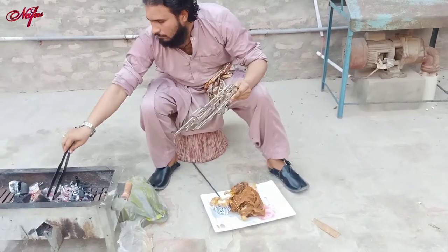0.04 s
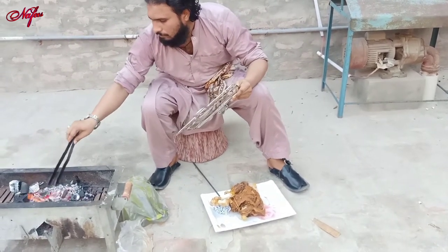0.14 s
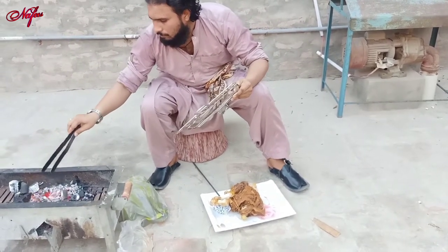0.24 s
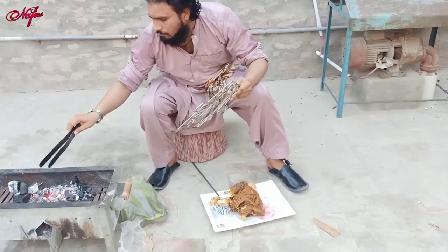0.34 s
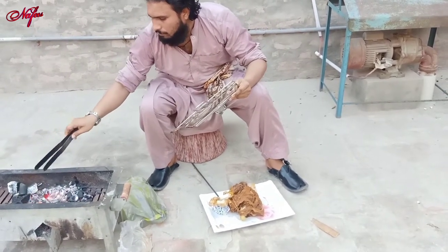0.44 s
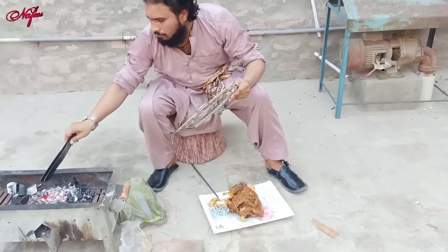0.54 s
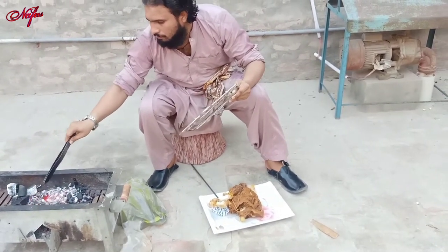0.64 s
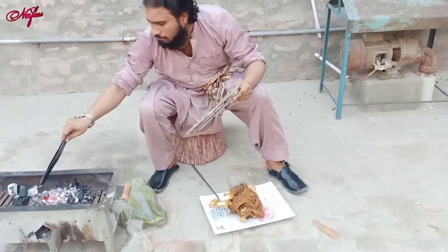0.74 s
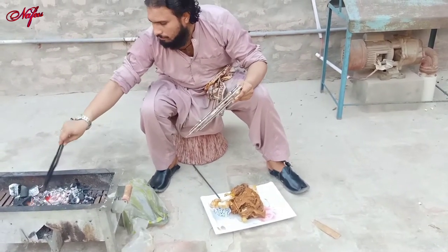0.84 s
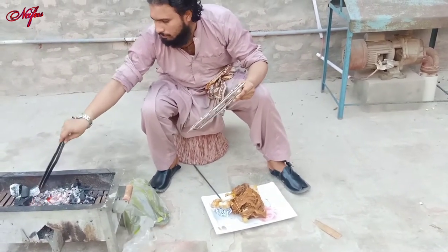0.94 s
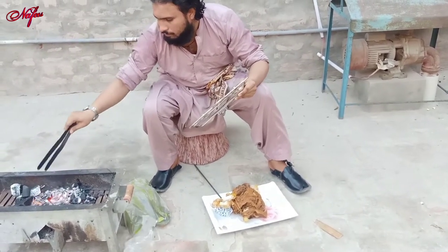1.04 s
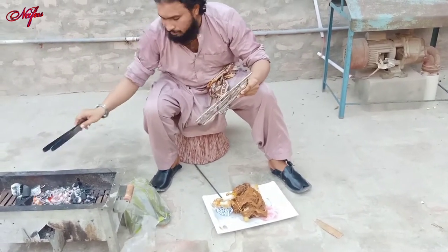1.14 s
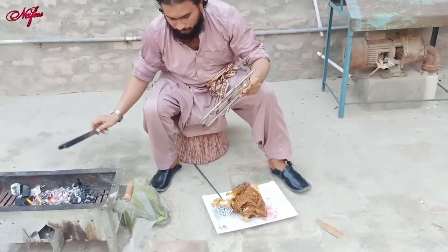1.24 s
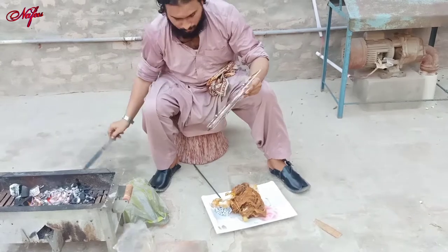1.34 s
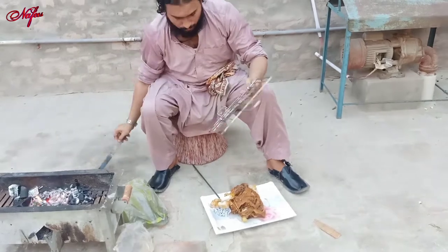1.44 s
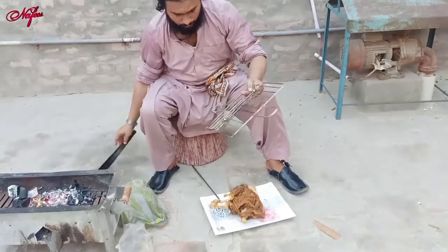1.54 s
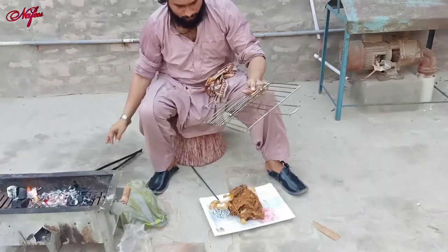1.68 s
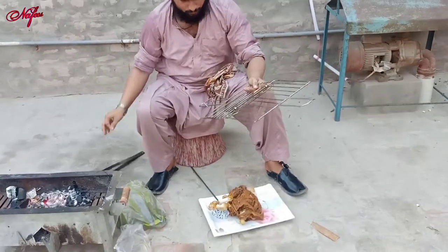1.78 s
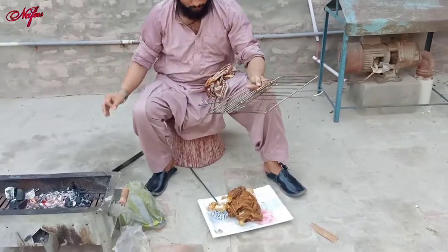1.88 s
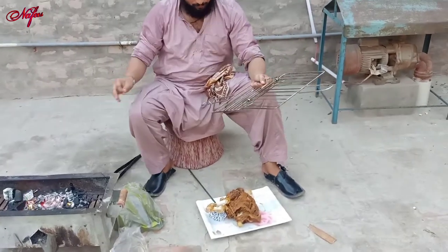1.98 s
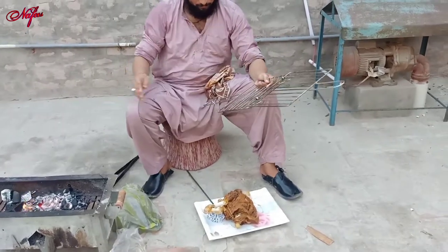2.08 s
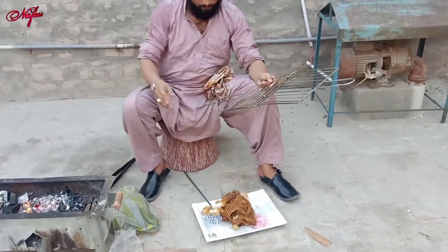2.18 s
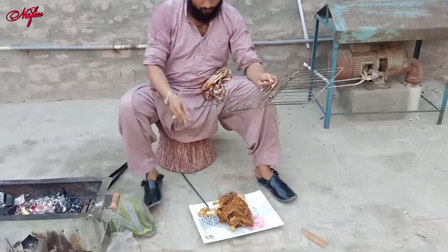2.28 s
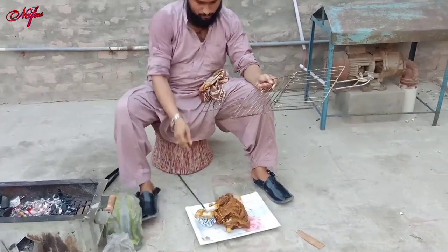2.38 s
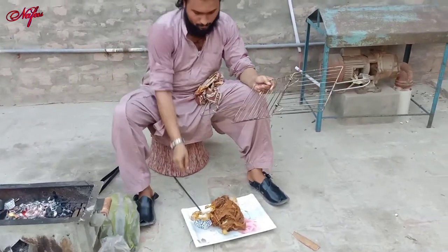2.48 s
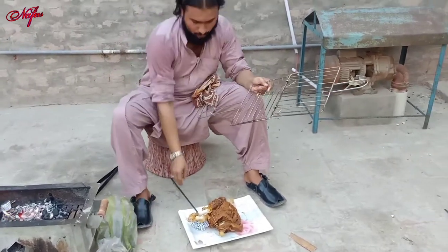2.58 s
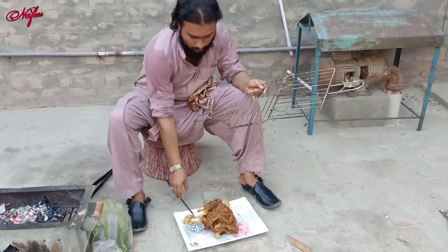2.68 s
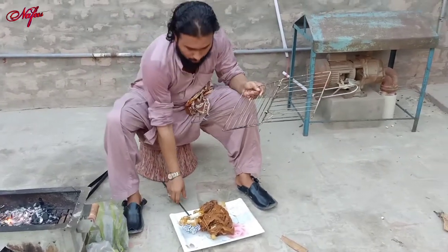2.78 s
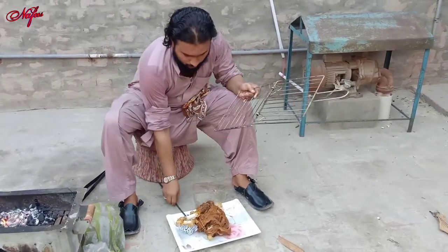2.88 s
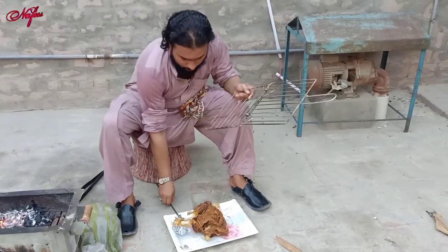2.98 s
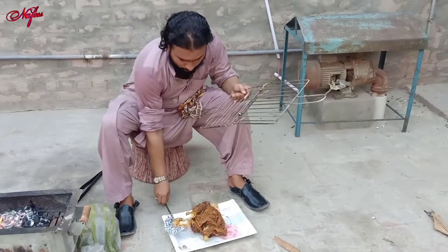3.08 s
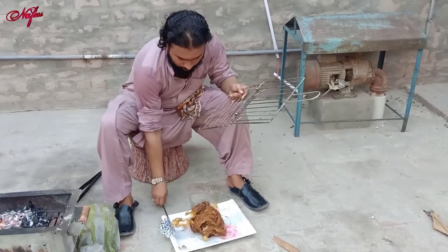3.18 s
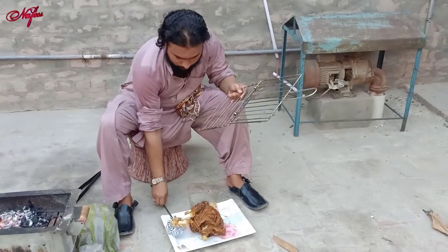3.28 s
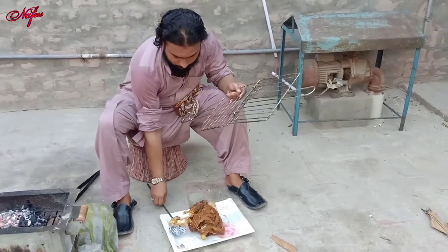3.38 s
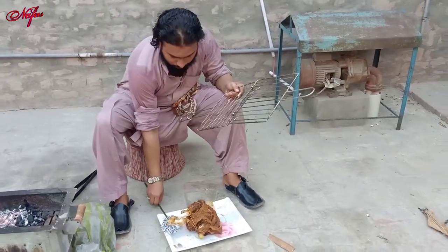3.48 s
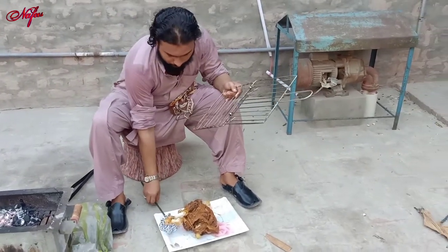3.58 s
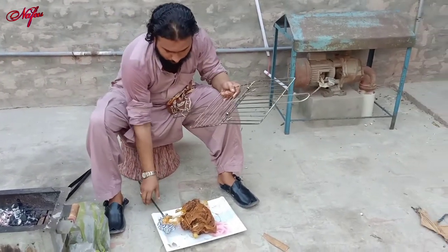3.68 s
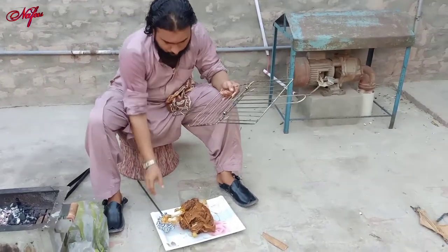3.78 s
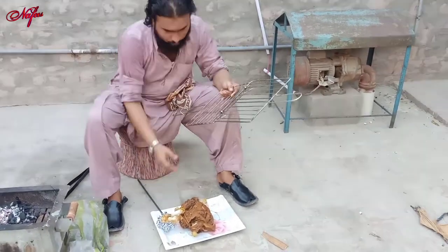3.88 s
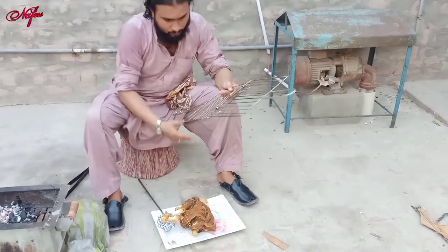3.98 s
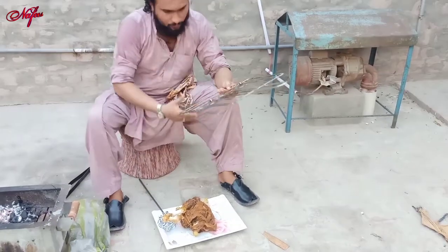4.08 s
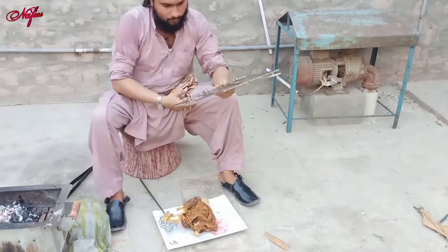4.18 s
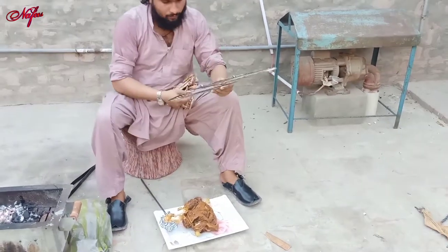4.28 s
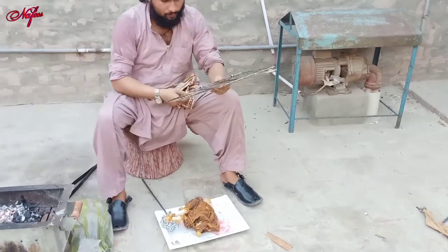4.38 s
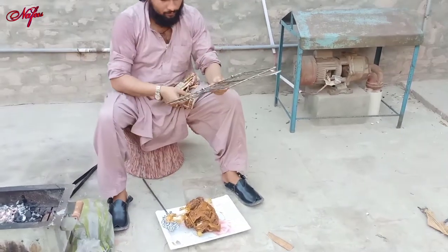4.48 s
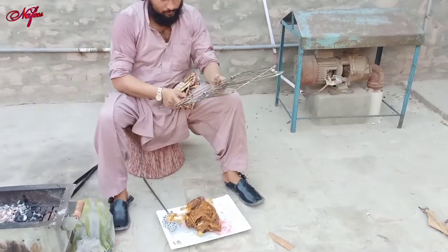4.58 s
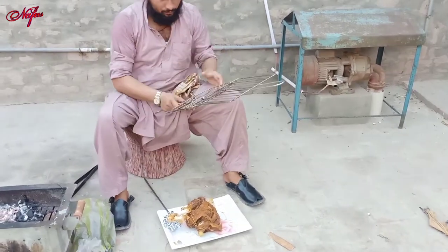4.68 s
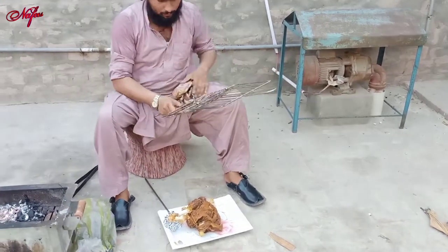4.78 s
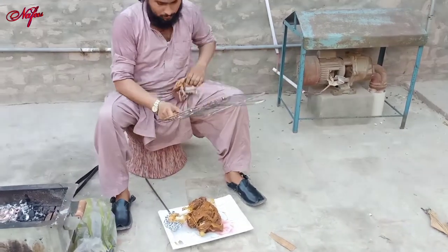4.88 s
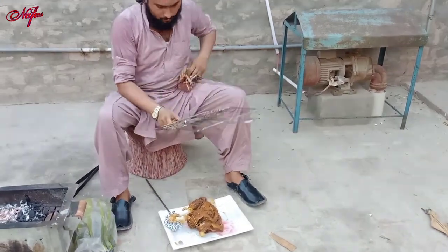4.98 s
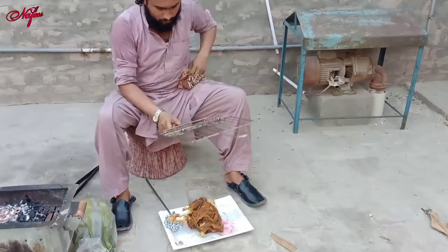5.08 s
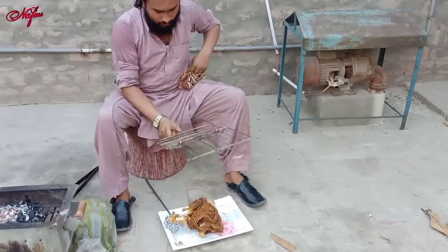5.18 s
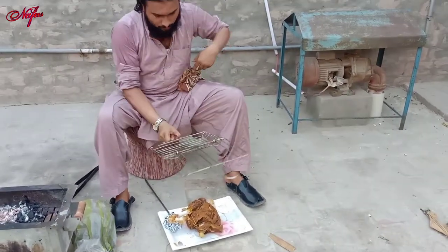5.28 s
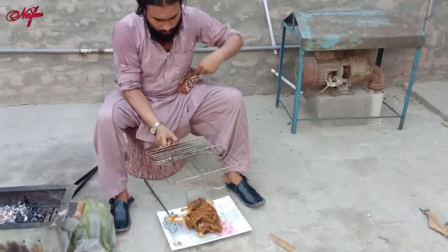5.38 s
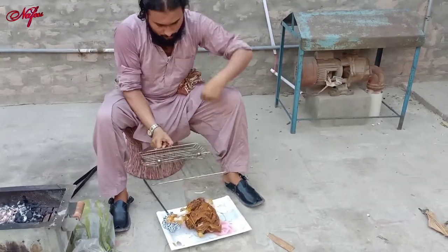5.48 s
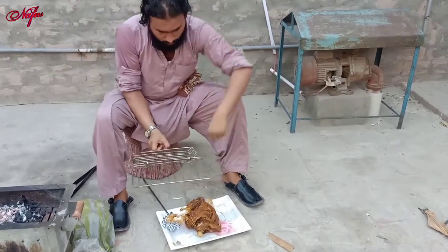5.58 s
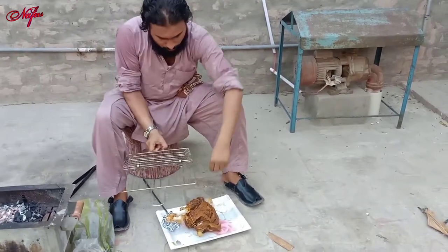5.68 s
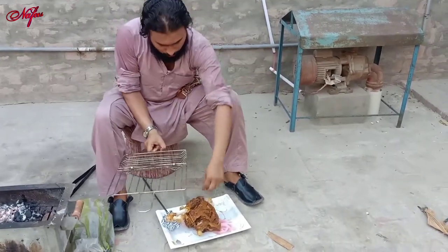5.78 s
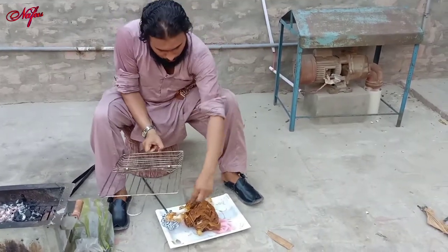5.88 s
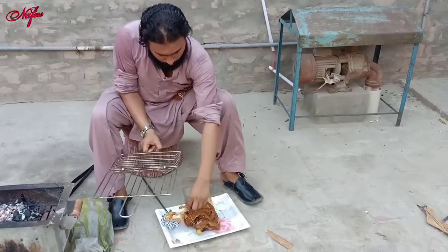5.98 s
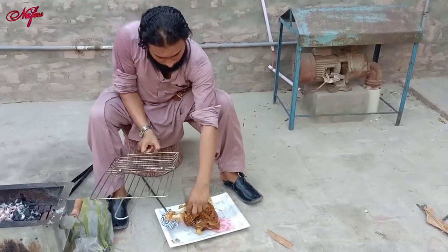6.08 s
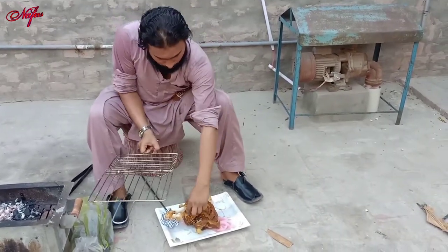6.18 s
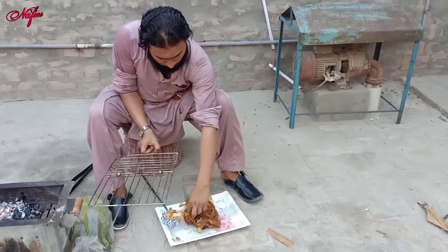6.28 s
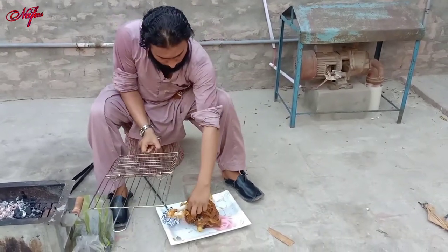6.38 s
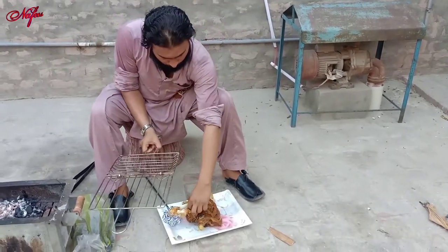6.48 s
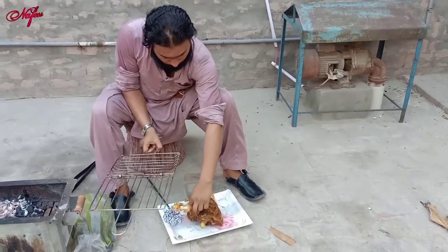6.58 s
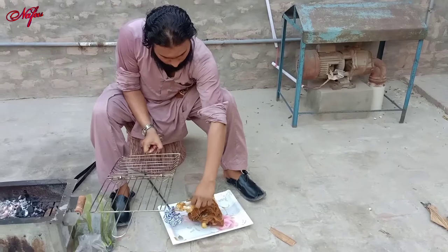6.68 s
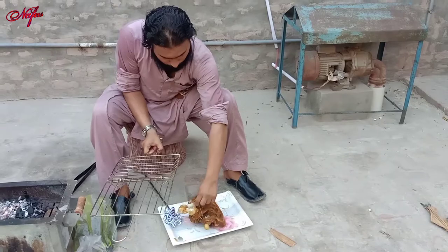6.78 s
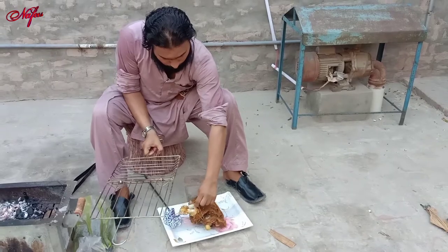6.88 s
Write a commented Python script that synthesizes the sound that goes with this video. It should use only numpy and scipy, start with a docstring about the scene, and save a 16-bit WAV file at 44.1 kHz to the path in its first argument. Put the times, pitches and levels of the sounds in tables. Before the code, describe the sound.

Charcoal crackles in a walled yard as steel tongs clatter down on concrete, a wire basket handle raps sharply, and one coal snaps loudly.

```python
"""Ember pops (sharp gas pushes after splintering), wash and gusts (shaped noise) last throughout in a walled
yard. First grit scrapes and a sheet-steel grill trough booms; at 1.6-2.1 s steel tongs knock it, are laid down
and bounce (cracks, crashes, modal ringing) amid more scrapes. At 3.5 s a basket's handle raps the ground and
the basket shudders (clacks, resonant noise). A basket clasp snaps loudly at 5.4 s; a faint tone glides at 6.5
s. Gusts buffet one microphone port or the other, and a flickering hum (narrow-band noise) comes in spells."""
import sys
import numpy as np
from scipy import signal
from scipy.fft import rfft, irfft, next_fast_len
from scipy.io import wavfile
from scipy.ndimage import uniform_filter1d, map_coordinates

SR = 44100
rng = np.random.default_rng(int(sys.argv[2]) if len(sys.argv) > 2 else 0)


def generate_wav(sig):
    """Save sig (samples, or channels by samples) to the path in sys.argv[1] as 16-bit PCM at SR."""
    pcm = np.round(np.clip(np.atleast_2d(sig).T, -1, 1) * 32767).astype(np.int16)
    wavfile.write(sys.argv[1], SR, pcm)


N = 306037

# Levels are source levels, ahead of the walls and the ports. Spectra are relative, in dB per Hz. # Ember pops,
# and first a bright tick as the first trough knock starts: t/s, push level/dB, tilt/(dB per octave)
EMBER_POPS = [(0.0705, -31, 4), (0.148, -33.5, 7.5), (0.2742, -40.5, 3), (0.4003, -41, 10),
              (0.4565, -29.5, 8.5), (0.7201, -26.5, 1), (0.916, -40, 10), (0.937, -35.5, 10),
              (1.104, -28.5, 9.5), (1.2363, -28.5, 6), (1.61, -25.5, 6.5), (2.0042, -29, 2),
              (2.373, -41, 13), (2.389, -37, 13), (2.475, -39, 7), (3.073, -36, 9), (3.265, -42, 13),
              (3.272, -30.5, 7.5), (3.307, -35, 9), (4.151, -27.5, 8), (4.4194, -34, 7.5), (4.51, -35.5, 8),
              (4.6472, -25, 9), (4.6933, -41, 10), (5.1042, -27, 7), (5.3579, -23, 7.5),
              (5.592, -32.5, 3.5), (5.795, -31.5, 10), (5.851, -35, 8), (5.9485, -39.5, 13),
              (6.0665, -27, 9.5), (6.137, -38, 12.5), (6.1913, -20, 6), (6.239, -43, 10), (6.318, -24, 5),
              (6.911, -35, 8)]
# Spectrum of a crack: f/Hz, level/dB
CRACK_SPECTRUM = [(710, -75), (1200, -15), (2030, -8), (2420, 6.5), (3080, 2.5), (4280, -4), (4930, -18.5),
                  (6780, -8), (10900, -42.5), (14000, -31), (15250, -40.5), (16000, -77)]
PUSH_AFTER_S, SPLINTER_DB = 0.00114, -0.5  # the push follows the splintering, whose level is relative to it
# One loud snap, cleaner than a pop, and its weaker bounce off the ground
SNAP_S, SNAP_DB, SNAP_SPLINTER_DB = 5.3868, -4.5, -9
BOUNCE_AFTER_S, BOUNCE_LOSS_DB = 0.000975, 2
# Spectrum of the snapping clasp: f/Hz, level/dB
SNAP_SPECTRUM = [(180, -64), (300, -17), (1400, -35.5), (2900, -2.5), (3800, -15.5), (4350, -12.5),
                 (5000, -18.5), (6300, -19.5), (10600, -40.5), (12500, -46), (15200, -46), (16000, -58)]
TAIL_DB, TAIL_T60_S, TAIL_TILT_DB = -35, .2, 10  # a bright noisy tail after the snap; tilt per octave

# Contacts of the tongs: t/s, crack level/dB, crash level/dB (each part offset in tongs()), ring level/dB,
# struck spot (0 tip to 1 bend), ring tilt/(dB per octave)
TONG_CONTACTS = [(1.554, -27.5, -54, -43.5, 0.18, -6), (1.7651, -8, -6, -38, 0.14, 7.5),
                 (1.772, -39, -13, -46, 0.09, 16), (1.7768, -24, -31, -42, 0.3, 6),
                 (1.905, -44, -29.5, -40, 0.5, 3), (1.956, -36, -41, -45, 0.61, -11),
                 (2.072, -15, -31.5, -29.5, 0.73, 8.5), (2.10, -45, -34, -34, 0.82, -13)]
# Modes of the tongs: f/Hz
STEEL_MODE_HZ = [1841, 2295, 2805, 3082, 3118, 3143, 3483, 4232, 4902, 4986, 5455, 6112, 6227, 7494, 8063,
                 8214, 8974, 10850, 11850, 13300, 15160]
# Strength of each mode in turn: level/dB struck at the tip, level/dB struck at the bend, t60/s
STEEL_MODES = [(-38, -25, .3), (3, -28, 0.32), (-5, -18, 0.45), (-7, -4, 0.098), (-22, 11, 0.21),
               (-20, 8, 0.23), (-15, 5, 0.067), (5, -7.5, 0.16), (-27, -2, 0.28), (-2, 0, 0.11),
               (9, -5, 0.089), (11, -16.5, 0.21), (-17, -4, 0.43), (-9, -33, 0.15), (-4, -28, 0.18),
               (-28, -17, 0.2), (-14, -40, 0.083), (-22, -37, 0.16), (-21, -49, 0.11), (-28, -38, .14),
               (-25, -50, 0.18)]
# Spectrum of steel on concrete: f/Hz, level/dB
THUD_SPECTRUM = [(59, -40), (110, -45), (200, -20), (418, -16.5), (1220, -2.5), (1510, -11), (2360, -7),
                 (3850, -18.5), (5310, -5.5), (8500, -55), (11000, -39), (15200, -25), (16500, -60)]
# The loose arms rattle: uneven noise in the same modes, over the ring, less for a blow on the bend
JANGLE_DB, JANGLE_BEND_DB, JANGLE_T60_S = 3, -3, .4
JANGLE_WIDTH_HZ, JANGLE_ROUGH_DB = 220, 4

# The handle lands and chatters: t/s, nominal level/dB (each part offset in handle())
HANDLE_RAPS = [(3.4601, -7), (3.4636, -10), (3.471, -16), (3.487, -19.5)]
# Spectrum of a rap: f/Hz, level/dB
HANDLE_SPECTRUM = [(240, -55), (500, -34), (1200, -13.5), (1580, -8), (2050, -12), (2500, -4), (2860, 4),
                   (3600, -8), (3990, -15.5), (6240, -13), (7600, -24), (8900, -60), (15000, -50)]
RASP_DB = -13  # the rasp that follows each blow, relative to it
# Short modes of the handle: f/Hz
CLACK_MODE_HZ = [1590, 1910, 2500, 2860, 3200, 3580, 4490]
# Strength of each short mode in turn: level/dB, t60/s
CLACK_MODES = [(-6, 0.04), (-17, 0.04), (-12, 0.05), (-7, 0.03), (-9.5, 0.04), (-14, .04), (-11, .025)]
# Resonances of the basket, shaking on after the first rap: f/Hz, width/Hz, level/dB
SHUDDER_MODES = [(654, 85, 2.5), (1100, 370, 4.5), (1570, 690, 0)]
SHUDDER_DB, SHUDDER_T60_S = -40, 0.78
WIRE_HZ, WIRE_WIDTH_HZ, WIRE_DB, WIRE_T60_S = 6330, 50, -51, 1.5  # the wires sing on unsteadily

# Knocks on the trough: t/s, boom level/dB, crunch level/dB
TROUGH_KNOCKS = [(.0695, -20.5, -21.5), (.19, -44, -56), (0.976, -35, -36.5)]
# Resonances of the sheet steel: f/Hz, width/Hz, level/dB
TROUGH_MODES = [(217, 90, -9.5), (320, 48, -2), (352.7, 19.6, 5.5), (472, 63, -7), (610, 130, -15),
                (1230, 240, -25.5)]

# One level curve for each scrape: t/s, level/dB
SCRAPE_LEVELS = [
    [(0.0, -49), (0.096, -59), (0.28, -75)],
    [(1.8, -38.5), (2.032, -58), (2.06, -72)],
    [(2.26, -66), (2.438, -50.5), (2.68, -70)],
]
# Spectrum of sliding grit: f/Hz, level/dB
GRIT_SPECTRUM = [(2060, 1.5), (3500, 7), (4840, -6), (6350, 2.5), (12600, -21), (14800, -34), (15600, -10),
                 (16500, -75)]

# Gusts on one port: start t/s, length/s, port (0 left, 1 right), rms level/dB at the start
GUST_TABLE = [(0.018, 0.035, 0, -32), (0.427, 0.045, 1, -37), (1.08, 0.09, 1, -39.5),
              (2.423, 0.19, 1, -42.5), (2.575, 0.14, 1, -28), (3.105, 0.19, 0, -27.5),
              (3.332, 0.18, 0, -31), (3.43, 0.21, 1, -36), (3.677, .11, 1, -33.5), (3.848, 0.18, 0, -41.5),
              (3.889, .16, 1, -40), (4.145, 0.34, 1, -29), (4.606, 0.106, 1, -41), (4.729, 0.42, 1, -26.5),
              (5.3, 0.083, 1, -37), (5.742, 0.25, 0, -37), (6.038, 0.22, 1, -33), (6.765, 0.056, 1, -41.5)]
GUST_EDGE_S, GUST_FADE_DB_PER_S = 0.023, 31  # quick start and stop, slow loss of strength
# Spectrum of turbulent air: f/Hz, level/dB
EDDY_SPECTRUM = [(20, -42), (50, -2), (85, 5), (160, -1.5), (260, -11), (450, -24), (900, -100)]
EDDIES_PER_S, EDDY_SWING_DB, EDDY_SPLIT_HZ = 30, 3, 130  # above the split the lumps swing twice as wide
# Single strong eddies that slap a port: t/s, port (0 left, 1 right), level/dB
EDDY_SLAPS = [(2.518, 1, -26), (2.615, 1, -17.5), (2.641, 1, -15), (3.139, 0, -22), (3.207, 0, -23),
              (3.289, 0, -30), (4.168, 1, -22.5), (4.222, 1, -23), (4.793, 1, -28), (4.857, 1, -17),
              (5.87, 0, -31), (6.351, 1, -27.5)]
SLAP_S, SLAP_TILT_DB = 0.0093, 2.5  # width at half amplitude; brighter than the gust, dB per octave

# Spectrum of the town's wash: f/Hz, level/dB
TOWN_SPECTRUM = [(45, -6), (75, 0.5), (300, -3), (600, -3.5), (870, -8.5), (1200, 0), (1900, -3.5),
                 (2600, -0.5), (3300, -7.5), (4100, -19.5), (6500, -18), (9500, -42.5), (15200, -44.5),
                 (16200, -74)]
# Strength of the wash: t/s, level/dB
WASH_LEVEL = [(0.0, -45.5), (1.51, -46.5), (1.91, -43.5), (2.78, -46), (6.94, -46.5)]
# Left-right likeness of the wash: f/Hz, correlation (-1 to 1)
WASH_LIKENESS = [(60, 0.86), (300, 0.86), (640, 0.11), (1400, -0.32), (3100, 0.2), (6800, -0.1)]
# Spells of hum: start t/s, end t/s, rms level/dB
HUM_TIMES = [(0.248, 1.483, -55.5), (2.6, 3.002, -56), (3.54, 3.995, -54), (4.2, 4.744, -54.5),
             (5.32, 6.6, -54.5), (6.84, 7, -57.5)]
HUM_HZ, HUM_WIDTH_HZ, HUM_EDGE_S = 315.2, 15.3, 0.029
# Faint glide: t/s, length/s, start f/Hz, end f/Hz, level/dB
GLIDES = [(6.535, .2, 895, 880, -56)]

# Early answers of the walls: delay t/s, level/dB
WALL_ANSWERS = [(.0095, -12), (.015, -20), (.025, -24)]
# Reverberation of the yard: f/Hz, t60/s
YARD_T60 = [(200, 0.85), (800, 1), (3000, 0.25), (9000, 0.45), (15000, 0.2)]
# How strongly the walls answer each place: level/dB
ANSWER_DB = {"grill": 0.5, "tongs": 0.5, "handle": -1}
# How much later the left port hears each place: delay/samples
LEFT_LAG = {"grill": 8.43, "tongs": 5.1, "handle": 4.1}
# How much louder the left port is than the right: f/Hz, level/dB
PORT_DIFFERENCE = [(300, -0.5), (900, 1), (1600, 1.5), (2700, 10.5), (4200, 6), (6000, 1), (9000, 10.5),
                   (15000, 0)]
LOW_CUT_HZ, TOP_HZ = 50, 16600


def amp(db):
    """Level law: a level in dB gives an amplitude gain."""
    return 10 ** (np.asarray(db) / 20)


def unit(x):
    """Normalisation to an rms of 1."""
    return x / np.sqrt(np.mean(x ** 2) + 1e-20)


def along(points, hz):
    """Logarithmic pitch scale: interpolates (f/Hz, value) points."""
    f, v = np.transpose(points)
    return np.interp(np.log(hz + 1), np.log(f + 1), v)


def colour(spectrum, tilt_db=0):
    """Spectral envelope: response of a spectrum, tilted about 4 kHz in dB per octave."""
    return lambda hz: amp(along(spectrum, hz) + tilt_db * np.log2((hz + 1) / 4000))


def modes(table):
    """Modal superposition: causal response of (f/Hz, width/Hz, level/dB) resonances, alternating in sign."""
    def response(f):
        total = 0
        for k, (centre, width, db) in enumerate(table):
            resonance = 1j * f * width / (centre * centre - f * f + 1j * f * width)
            total = total + (-1) ** k * amp(db) * resonance
        return total
    return response


def filtered(x, response):
    """Linear filtering: multiplies the spectrum of x by a response of frequency."""
    n = x.shape[-1]
    m = next_fast_len(n + 8192)
    return irfft(rfft(x, m) * response(np.fft.rfftfreq(m, 1 / SR)), m)[..., :n]


def level(rows):
    """Amplitude envelope: gain per sample of a (t/s, level/dB) curve, -120 dB outside it."""
    s, db = np.transpose(rows)
    return amp(np.interp(np.arange(N) / SR, s, db, left=-120, right=-120))


def gate(start, end, edge):
    """Linear switching: gain ramps over edge seconds, half open at start and end."""
    t = np.arange(N) / SR
    return np.clip(np.minimum(t - start, end - t) / edge + .5, 0, 1)


def wobble(rate):
    """Slow random fluctuation: a smooth curve with rate knots a second."""
    knots = rng.standard_normal(int(N * rate / SR) + 4)
    return map_coordinates(knots, [np.arange(N) * rate / SR])


def add(track, s, sound):
    """Superposition: mixes a sound into the track at s seconds."""
    spot = track[..., round(s * SR):round(s * SR) + sound.shape[-1]]
    spot += sound[..., :spot.shape[-1]]


def pulse(response, size=2048):
    """Minimum phase: a causal push of peak 1 with a given colour, by folding the cepstrum."""
    cepstrum = irfft(np.log(response(np.fft.rfftfreq(size, 1 / SR)) + 1e-6), size)
    cepstrum[1:size // 2] *= 2
    cepstrum[size // 2 + 1:] = 0
    x = irfft(np.exp(rfft(cepstrum)), size)[:size // 2]
    return x / np.abs(x).max()


def burst(t60, response, rise=0.00063, rough_db=0):
    """Exponential decay: coloured noise with peaks near 1, cut at 0.5 s; rough ones come in lumps."""
    t = np.arange(SR // 2) / SR
    shape = amp(-60 * t / t60) * (1 - np.exp(-t / rise)) ** 2
    lumps = amp(rough_db * np.interp(t, np.arange(100) / 180, rng.standard_normal(100)))
    x = filtered(rng.standard_normal(len(t)), response) * lumps * shape
    return 0.58 * x * np.linalg.norm(shape) / np.linalg.norm(x) / shape.max()


def ring(table, spread_db, attack=0.0015):
    """Free modal vibration: each struck mode decays at a randomly varied strength; loose parts make it flutter."""
    t = np.arange(SR // 2) / SR
    total = np.zeros(len(t))
    for hz, db, t60 in table:
        decay = amp(db + rng.normal(0, spread_db) - 60 * t / t60)
        flutter = amp(2.5 * np.interp(t, np.arange(40) / 70, rng.standard_normal(40)))
        total += decay * flutter * np.sin(2 * np.pi * (hz * t + rng.random()))
    return (1 - np.exp(-t / attack)) * total


def rush(spectrum, alike, patchy_db):
    """Partial coherence: stereo noise of rms 1, with a set likeness and patches of random gain."""
    z = signal.stft(rng.standard_normal((2, N)), nperseg=512)[2]
    over_pitch = uniform_filter1d(rng.standard_normal(z.shape[1:]), 6, 0)
    patches = unit(uniform_filter1d(over_pitch, 12, 1))
    pair = signal.istft(z * amp(patchy_db * patches), nperseg=512)[1][:, :N]

    def mid_side(hz):
        turn = np.arccos(np.clip(along(alike, hz), -1, 1)) / 2
        return amp(along(spectrum, hz)) * [np.cos(turn), np.sin(turn)]

    mid, side = filtered(pair, mid_side)
    return unit(np.array([mid + side, mid - side]))


def embers():
    """Impulsive gas release: each pop is one sharp push after a brief splintering; a basket clasp also snaps
    and bounces."""
    out = np.zeros(N)
    cracks = [(s, db, SPLINTER_DB, colour(CRACK_SPECTRUM, tilt_db)) for s, db, tilt_db in EMBER_POPS]
    snap_colour = colour(SNAP_SPECTRUM)
    cracks.append((SNAP_S, SNAP_DB, SNAP_SPLINTER_DB, snap_colour))
    cracks.append((SNAP_S + BOUNCE_AFTER_S, SNAP_DB - BOUNCE_LOSS_DB, SNAP_SPLINTER_DB, snap_colour))
    for s, db, splinter_db, response in cracks:
        add(out, s + PUSH_AFTER_S, amp(db) * pulse(response))
        add(out, s, amp(db + splinter_db) * burst(.011, response, rise=.0009))
    tail = burst(TAIL_T60_S, colour(SNAP_SPECTRUM, TAIL_TILT_DB), rise=0.0012)
    add(out, SNAP_S, amp(TAIL_DB) * tail)
    return out


def tongs():
    """Impact excitation: a contact cracks, crashes on what it meets and rings modes set by the struck spot."""
    out = np.zeros(N)
    hollow = modes([(418, 35, 13.3), (630, 100, 1.5)])
    for s, crack_db, crash_db, ring_db, spot, tilt_db in TONG_CONTACTS:
        struck = []
        for hz, (tip_db, bend_db, t60) in zip(STEEL_MODE_HZ, STEEL_MODES):
            spot_db = tip_db + spot * (bend_db - tip_db)
            struck.append((hz, spot_db + tilt_db * np.log2(hz / 4000), t60))
        add(out, s, amp(crack_db) * burst(0.035, colour(CRACK_SPECTRUM, 2.5)))
        add(out, s, amp(crash_db + 5) * pulse(colour(THUD_SPECTRUM)))
        add(out, s, amp(crash_db - 4.5) * burst(0.035, colour(THUD_SPECTRUM)))
        add(out, s, amp(crash_db - 8.0) * burst(0.034, hollow, rise=0.00029))  # hollow thump
        add(out, s, amp(ring_db) * ring(struck, 0.33))
        rattling = modes([(hz, JANGLE_WIDTH_HZ, db) for hz, db, _ in struck])
        jangle = burst(JANGLE_T60_S, rattling, rough_db=JANGLE_ROUGH_DB)
        add(out, s, amp(ring_db + JANGLE_DB + spot * JANGLE_BEND_DB) * jangle)
    return out


def handle():
    """Damped impact: the basket's handle clacks short and rough, then the basket shudders and its wires sing."""
    out = np.zeros(N)
    clack_modes = [(hz, *mode) for hz, mode in zip(CLACK_MODE_HZ, CLACK_MODES)]
    for s, db in HANDLE_RAPS:
        add(out, s, amp(db + 1.5) * pulse(colour(HANDLE_SPECTRUM)))
        add(out, s, amp(db - 8) * ring(clack_modes, 2, attack=0.00031))
        add(out, s, amp(db + RASP_DB) * burst(0.098, colour(HANDLE_SPECTRUM), rise=0.0013))
    first_s = HANDLE_RAPS[0][0]
    shudder = burst(SHUDDER_T60_S, modes(SHUDDER_MODES), rise=0.005, rough_db=4.5)
    wires = burst(WIRE_T60_S, modes([(WIRE_HZ, WIRE_WIDTH_HZ, 0)]), rise=0.015)
    add(out, first_s, amp(SHUDDER_DB) * shudder)
    add(out, first_s, amp(WIRE_DB) * wires)
    return out


def trough():
    """Plate resonance: shifting coals shake the sheet steel into a boom and an uneven crunch."""
    out = np.zeros(N)
    for s, boom_db, crunch_db in TROUGH_KNOCKS:
        add(out, s, amp(boom_db) * burst(0.46, modes(TROUGH_MODES), rise=0.0034))
        crunch = burst(0.16, colour(CRACK_SPECTRUM, -5), rise=0.004, rough_db=2)
        add(out, s, amp(crunch_db) * crunch)
    return out


def scrapes():
    """Sliding friction: grit under coals, steel and a shoe sole gives grainy bright noise."""
    grains = amp(3 * wobble(240) + 2.2 * wobble(40))
    grit = unit(grains * rush(GRIT_SPECTRUM, [(4000, 0.9)], patchy_db=2))
    return sum(map(level, SCRAPE_LEVELS)) * grit


def breeze():
    """Turbulent pressure: gusts of lumpy low noise sit on single ports; a few eddies slap harder."""
    t, strength = np.arange(N) / SR, np.zeros((2, N))
    for s, length, port, db in GUST_TABLE:
        fading = amp(db - GUST_FADE_DB_PER_S * (t - s))
        strength[port] += fading * gate(s, s + length, GUST_EDGE_S)
    lumps = amp(EDDY_SWING_DB * np.array([wobble(EDDIES_PER_S), wobble(EDDIES_PER_S)]))
    air = filtered(rng.standard_normal((2, N)), colour(EDDY_SPECTRUM))
    upper = filtered(air, lambda hz: hz ** 4 / (hz ** 4 + EDDY_SPLIT_HZ ** 4))
    out = strength * unit(unit(lumps) * (air - upper) + unit(lumps ** 2) * upper)

    near = np.arange(-SR // 10, SR // 10) / SR  # time about the middle of a slap
    shape = np.exp(-2.8 * (near / SLAP_S) ** 2)
    brighter = lambda hz: amp(along(EDDY_SPECTRUM, hz) + SLAP_TILT_DB * np.log2((hz + 1) / 100))
    for s, port, db in EDDY_SLAPS:
        puff = filtered(rng.standard_normal(len(near)), brighter) * shape
        add(out[port], s + near[0], amp(db) * puff * np.linalg.norm(shape) / np.linalg.norm(puff))
    return out


def town():
    """Diffuse field and narrow-band beating: a far broad wash and a flickering hum that comes in spells."""
    wash = level(WASH_LEVEL) * rush(TOWN_SPECTRUM, WASH_LIKENESS, patchy_db=1.2)
    narrow = lambda hz: np.exp(-((hz - HUM_HZ) / HUM_WIDTH_HZ) ** 2)
    hum = unit(filtered(rng.standard_normal(N), narrow))
    spells = sum(amp(db) * gate(start, end, HUM_EDGE_S) for start, end, db in HUM_TIMES)
    return wash + hum * spells


def far_tones():
    """Frequency modulation: summed phase makes a faint gliding tone from far off."""
    out = np.zeros(N)
    for s, length, from_hz, to_hz, db in GLIDES:
        hz = np.linspace(from_hz, to_hz, round(length * SR))
        tone = np.sin(2 * np.pi * np.cumsum(hz) / SR)
        add(out, s, amp(db) * np.hanning(len(hz)) ** .5 * tone)
    return out


def yard(x):
    """Reflection and reverberation: near walls answer and each frequency dies at its own speed."""
    hz, t, z = signal.stft(rng.standard_normal((2, SR // 2)), SR, nperseg=256)
    decay = amp(-60 * t / along(YARD_T60, hz)[:, None])
    tail = signal.istft(z * decay, SR, nperseg=256)[1]
    # the tail starts 300 samples after the direct sound
    answer = np.pad(amp(-16.5) * tail / np.linalg.norm(tail[0]), ((0, 0), (300, 0)))
    for delay, db in WALL_ANSWERS:
        for port in answer:
            rough = rng.standard_normal(80) * amp(-np.arange(80) / 1.5)  # uneven brick scatters the answer
            add(port, delay + rng.uniform(0, 0.00029), amp(db) * unit(rough) / np.sqrt(len(rough)))
    return signal.fftconvolve(x[None], answer, axes=1)[:, :N]


def scene():
    """Time difference of arrival: near sources reach the right port first, then the walls answer."""
    near = {"grill": embers() + trough(), "tongs": tongs(), "handle": handle()}
    late = lambda lag: lambda hz: np.exp(-2j * np.pi * hz * np.array([[lag], [0]]) / SR)
    direct = sum(filtered(x, late(LEFT_LAG[place])) for place, x in near.items())
    answered = yard(sum(amp(ANSWER_DB[place]) * x for place, x in near.items()))
    return direct + answered + scrapes() + breeze() + town() + far_tones()


def record(dry):
    """Band limits and saturation: ports differ in colour, bass is cut, peaks round off, the top is shut."""
    def port_response(hz):
        low_cut = (1j * hz / (LOW_CUT_HZ + 1j * hz)) ** 2
        return amp(along(PORT_DIFFERENCE, hz) * [[.5], [-.5]]) * low_cut

    ports = filtered(dry, port_response)
    rounded = ports / (1 + np.abs(ports / .95) ** 4) ** .25
    return filtered(rounded, lambda hz: hz < TOP_HZ)


dry = scene()
out = record(dry)
generate_wav(out)
```